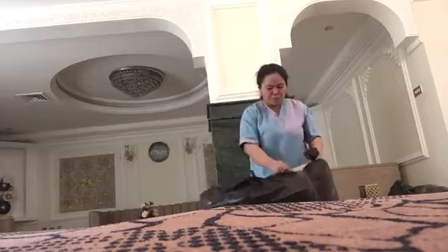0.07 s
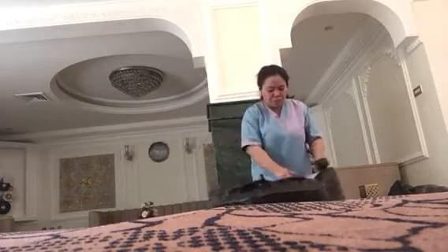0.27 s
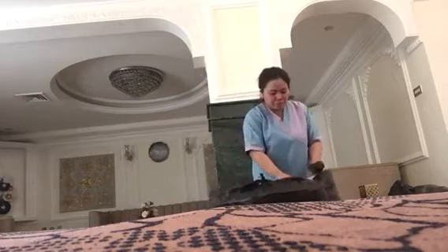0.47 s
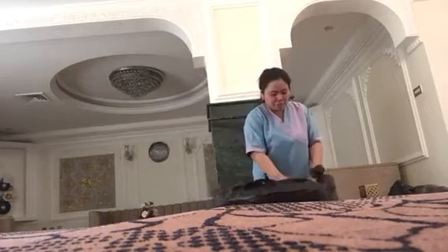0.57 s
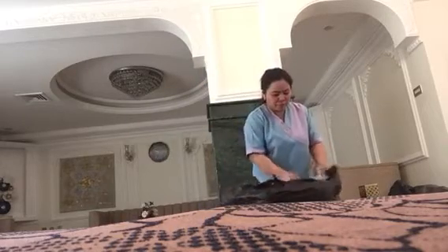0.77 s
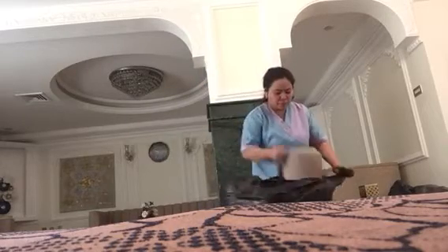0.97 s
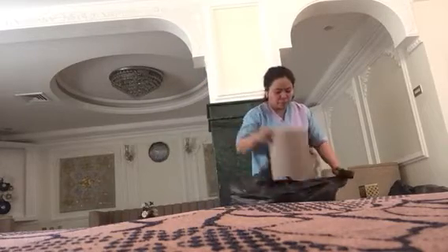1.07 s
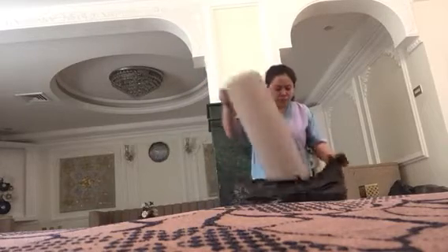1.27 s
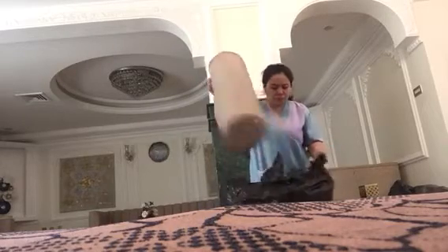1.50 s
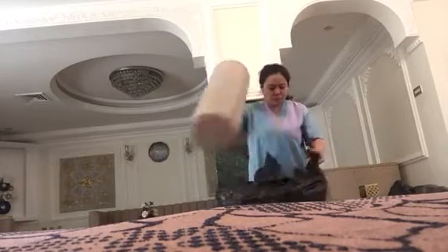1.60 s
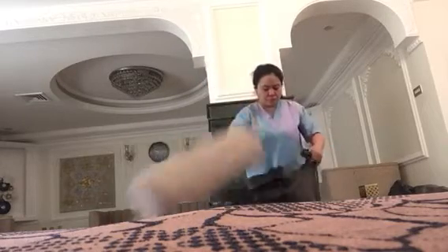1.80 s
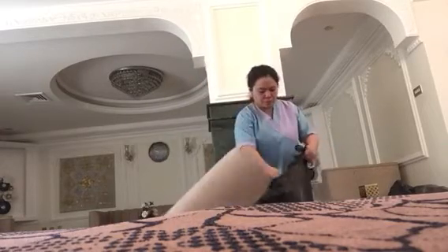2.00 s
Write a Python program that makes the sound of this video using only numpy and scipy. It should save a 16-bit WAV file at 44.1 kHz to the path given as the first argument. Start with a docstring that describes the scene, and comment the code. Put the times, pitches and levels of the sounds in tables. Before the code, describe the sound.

Cloth is handled in a large echoing room, opening with the loudest moment: soft booming thumps, sharp fabric snaps and two quick swishes at about 0.1 to 0.3 seconds. Lighter bumps follow near 0.45 and 0.6. Around 1 second a bolster cushion drags out of its bag with a quiet, rising hollow rub. Fabric keeps sliding until the cushion lands softly near 2 seconds, over faint hum and ventilation.

```python
"""Bolster cushion out of its bag

A bolster cushion is pulled out of a cloth bag, swung over and set down in a large, hard-walled room.
Soft thumps and a few snaps of taut cloth come first; then cloth slides and rubs in strokes, and the
cushion lands. The room booms and echoes over a faint electric hum and ventilation."""
import sys
import numpy as np
from scipy import signal
from scipy.fft import rfft, irfft
from scipy.io import wavfile
from scipy.ndimage import uniform_filter1d

SR = 44100
rng = np.random.default_rng(int(sys.argv[2]) if len(sys.argv) > 2 else 0)


def wav_out(sig):
    """Save sig, one row per channel (or a flat mono array), as 16-bit PCM at SR to the path in sys.argv[1]."""
    wavfile.write(sys.argv[1], SR, np.round(np.clip(np.atleast_2d(sig).T, -1, 1) * 32767).astype(np.int16))


N = 90404
T = np.arange(N) / SR

# Spectrum of rubbed stuffing. Each row: frequency in Hz, level in dB.
RUB_SPECTRUM = [(20, -26), (80, 5), (160, 7.5), (300, 8.5), (450, 1), (720, 2.5), (1400, -5), (1900, -10),
                (2600, -12.5), (5000, -27), (16000, -49)]


def amp(db):
    """Decibels to gain."""
    return 10 ** (np.asarray(db) / 20)


def unit(x):
    """Scale to rms 1."""
    return x / np.sqrt(np.mean(x ** 2) + 1e-20)


def interp_log(points, hz):
    """Interpolate a table on a log-frequency axis."""
    f, value = np.transpose(points)
    return np.interp(np.log(hz + 1), np.log(f + 1), value)


def colour(x, spectrum, peak_hz=1000, peak_db=0, width_oct=0.3):
    """Filter x by a spectrum plus one optional resonance; rms 1."""
    hz = np.fft.rfftfreq(N, 1 / SR)
    resonance_db = peak_db * np.exp(-0.5 * (np.log2((hz + 1) / peak_hz) / width_oct) ** 2)
    return unit(irfft(rfft(x) * amp(interp_log(spectrum, hz) + resonance_db), N))


def resonate(x, hz, width_hz):
    """Steep resonance following the curve hz; rms 1."""
    carrier = np.exp(2j * np.pi * np.cumsum(hz) / SR)
    pole = np.exp(-np.pi * width_hz / SR)
    return unit((carrier * signal.lfilter([1], [1, -2 * pole, pole * pole], x / carrier)).real)


def smooth_noise(first_samples, second_samples):
    """Noise through two moving averages; rms 1."""
    return unit(uniform_filter1d(uniform_filter1d(rng.standard_normal(N), first_samples), second_samples))


def stroke(peak_s, rise_s, hold_s, fall_s, db):
    """Envelope of one movement: Gaussian rise, hold, exponential fall."""
    rise = np.minimum(T - peak_s, 0) / rise_s
    fall = np.maximum(T - peak_s - hold_s, 0) / fall_s
    return amp(db) * np.exp(-0.5 * rise ** 2 - fall)


def friction(grit, flutter_db):
    """Fibre hiss and tiny slipping creases, fluttering as the contact changes."""
    creases_per_s, spread_db = 1300, 1.5
    creases = rng.standard_normal(N) * amp(spread_db * np.minimum(rng.exponential(1, N), 4))
    creases *= rng.random(N) < creases_per_s / SR
    flutter = amp(flutter_db * smooth_noise(300, 200))
    return (rng.standard_normal(N) + grit * unit(creases)) * flutter


def room(x, early_db, tail_db, early_decay_s):
    """Direct sound, near reflections and the long tail off hard walls."""
    # Room decay. Each row: frequency in Hz, T60 in seconds.
    decay = [(60, 0.61), (200, 1.14), (500, 1.16), (1300, 0.82), (3000, 1.02), (6000, 0.69), (16000, 0.5)]
    taps = rng.choice([-1., 1.], (2, N)) * (rng.random((2, N)) < 1 / 12) * (T > 0.006)
    hz, t, bins = signal.stft(taps[0], SR, nperseg=256)
    bins = bins * amp(-60 * t / interp_log(decay, hz)[:, None])
    tail = signal.istft(bins, SR, nperseg=256)[1][:N] * np.minimum(T / 0.064, 1)
    early = taps[1] * np.exp(-T / early_decay_s)
    echo = amp(tail_db) * tail / np.linalg.norm(tail) + amp(early_db) * early / np.linalg.norm(early)
    return x + signal.fftconvolve(x, echo)[:N]


def background():
    """Steady ventilation and a wavering electric hum."""
    # Ventilation spectrum. Each row: frequency in Hz, level in dB.
    air_spectrum = [(20, -29), (35, -2), (48, 16), (70, 2.5), (120, -4.5), (200, -2), (350, -10.5),
                    (800, -14.5), (2000, -23), (6000, -25.5), (9000, -33.5), (16000, -36)]
    air_db, hum_db, hum_hz = -58.5, -63.5, 99.5
    waver = unit(sum(np.sin(2 * np.pi * (hz * T + rng.random())) for hz in np.geomspace(0.4, 4, 10)))
    hum = amp(hum_db + 0.64 * waver) * np.sqrt(2) * np.sin(2 * np.pi * hum_hz * T)
    return amp(air_db) * colour(rng.standard_normal(N), air_spectrum) + hum


def slides():
    """Cloth slides over the cushion: friction with a high sheen."""
    # Each row: peak time, rise, hold and fall in seconds, level in dB, sheen in dB.
    strokes = [(0.085, 0.036, 0.042, 0.027, -65, -6), (0.706, 0.064, 0.085, 0.035, -70.5, 0.5),
               (0.829, 0.016, 0.14, 0.028, -63, 1), (0.962, 0.04, 0.085, 0.072, -58, 0),
               (1.185, 0.12, 0.27, 0.066, -64.5, -2.5), (1.375, 0.044, 0.019, 0.069, -58, 1.5),
               (1.498, 0.037, 0.043, 0.094, -64.5, 2.5), (1.692, 0.055, 0.11, 0.093, -69.5, -4),
               (1.879, 0.044, 0.047, 0.043, -61, 3.5), (1.959, 0.0063, 0.0098, 0.07, -51.5, -1.5)]
    # Each row: frequency in Hz, level in dB.
    spectrum = [(60, -7), (250, 5), (600, 3.5), (1200, 4.5), (2200, 1), (4200, 1), (5200, -1.5), (6100, 1),
                (7000, -3.5), (8200, -8.5), (9500, -7.5), (10400, -13), (11500, -8.5), (14000, -12.5),
                (16000, -12.5)]
    out = np.zeros(N)
    for *shape, sheen_db in strokes:
        hiss = friction(grit=0.57, flutter_db=1.0)
        out += colour(hiss, spectrum, peak_hz=13400, peak_db=sheen_db, width_oct=0.55) * stroke(*shape)
    return room(out, early_db=-18, tail_db=-12, early_decay_s=0.044)


def rubs():
    """Stuffing rubs under the hands: dull, grainy friction with a faint squeak."""
    # Each row: peak time, rise, hold and fall in seconds, level in dB, squeak in Hz.
    strokes = [(0.1, 0.0018, 0.046, 0.027, -48.5, 940), (0.635, 0.0028, 0.021, 0.055, -56, 1210),
               (0.874, 0.11, 0.016, 0.051, -63, 1230), (1.258, 0.09, 0.026, 0.02, -62.5, 1300),
               (1.361, 0.007, 0.034, 0.012, -58, 744), (1.863, 0.0057, 0.0056, 0.013, -62.5, 700),
               (1.961, 0.0016, 0.021, 0.052, -55, 1090)]
    out = np.zeros(N)
    for *shape, squeak_hz in strokes:
        grain = friction(grit=1.0, flutter_db=3.0)
        out += colour(grain, RUB_SPECTRUM, squeak_hz, peak_db=3.5, width_oct=0.25) * stroke(*shape)
    return room(out, early_db=-4, tail_db=-10.5, early_decay_s=0.015)


def snaps():
    """Cloth snaps taut: gritty clicks that peak within one cycle."""
    # Each row: start in seconds, pitch in Hz, level in dB.
    clicks = [(0.1362, 1800, -32.5), (0.1374, 680, -33), (0.1478, 1090, -42), (0.1525, 1280, -25.5),
              (0.1724, 730, -31.5), (0.4480, 610, -49.5), (0.6360, 890, -43), (0.645, 1640, -49)]
    rise_cycles = 0.79
    out = np.zeros(N)
    for start_s, hz, db in clicks:
        age = np.maximum(T - start_s, 0) * hz / rise_cycles
        tone = np.sin(2 * np.pi * hz * (T - start_s))
        grit = 0.33 * smooth_noise(13, 9)
        out += amp(db) * (tone + grit) * (age * np.exp(1 - age)) ** 2
    return room(out, early_db=-9.5, tail_db=-12.5, early_decay_s=0.06)


def thumps():
    """Soft blows on the padded floor: a low push and a cloth scuff, leaving a boom."""
    # Each row: peak time in seconds, pitch in Hz, level in dB, width in seconds, relative scuff in dB.
    blows = [(0.1451, 107, -24.5, 0.0037, -4), (0.1697, 105, -25, 0.005, -7.5),
             (0.1804, 140.2, -17, 0.00528, -14), (0.218, 84, -31, 0.0072, -12),
             (0.4330, 83, -39.5, 0.007, -11.5), (0.4539, 126.6, -31.5, 0.00735, -8),
             (0.6271, 95.5, -36, 0.0041, -10), (1.966, 165, -40, 0.0052, -2.5),
             (2.0337, 126, -38.5, 0.0085, -3)]
    # Each row: frequency in Hz, level in dB.
    scuff_spectrum = [(40, -3), (90, -13), (180, 1.5), (240, 0.5), (330, -3), (420, -13), (520, -10.5),
                      (800, -20.5), (1500, -33), (4000, -58), (16000, -93)]
    # Low resonances. Each row: frequency in Hz, level relative to the blow in dB, T60 in seconds.
    boom_modes = [(59, -26.5, 1.48), (90.3, -16.5, 1.0), (140, -19, 0.3), (184.5, -17, 0.28),
                  (253.7, -29, 0.26), (333, -29.5, 0.37), (524, -42, .5)]
    scuff_rise_s, scuff_fall_s = 0.0044, 0.023
    impacts, booms = np.zeros(N), np.zeros(N)
    for peak_s, hz, db, width_s, scuff_db in blows:
        push = np.cos(2 * np.pi * hz * (T - peak_s)) * np.exp(-0.5 * ((T - peak_s) / width_s) ** 2)
        age_s = np.maximum(T - peak_s + width_s, 0)
        scuff = colour(rng.standard_normal(N), scuff_spectrum)
        scuff *= np.minimum(age_s / scuff_rise_s, 1) * np.exp(-age_s / scuff_fall_s)
        impacts += amp(db) * (push + amp(scuff_db) * scuff)
        onset = np.minimum(age_s / width_s / 2, 1)
        for mode_hz, mode_db, t60_s in boom_modes:
            ring = np.sin(2 * np.pi * (mode_hz * age_s + rng.random()))
            booms += amp(db + mode_db - 60 * age_s / t60_s) * onset * ring
    return room(impacts, early_db=-10, tail_db=-17, early_decay_s=0.039) + booms


def sweeps():
    """Quick sweeps of smooth cloth: friction with a bright resonance."""
    # Each row: peak time, rise, hold and fall in seconds, level in dB, ring in Hz, ring boost in dB.
    strokes = [(0.194, 0.031, 0.049, 0.029, -50.5, 6500, 4.5),
               (0.247, 0.025, 0.023, 0.033, -51.5, 5100, 6.5)]
    # Each row: frequency in Hz, level in dB.
    spectrum = [(100, 0), (750, 8.5), (1100, -7), (1600, 2), (2500, -3.5), (3300, 1.5), (3900, -5.5),
                (4700, -2), (5800, -1.5), (7000, -9), (8700, -12.5), (10500, -16.5), (12500, -10.5),
                (13700, -11), (14600, -15), (16000, -16)]
    out = np.zeros(N)
    for *shape, ring_hz, ring_db in strokes:
        hiss = friction(grit=0.42, flutter_db=0.5)
        out += colour(hiss, spectrum, ring_hz, ring_db, width_oct=0.41) * stroke(*shape)
    return room(out, early_db=-7, tail_db=-11, early_decay_s=0.024)


def pull():
    """The cushion drags out of the bag: friction drives a rising hollow resonance and squeak."""
    # Each row: time in seconds, level in dB, hollow resonance in Hz, squeak in Hz.
    drag = [(0.898, -68, 192, 774), (1.015, -60.5, 212, 890), (1.06, -59.5, 192, 990),
            (1.10, -54, 213, 1120), (1.13, -57, 242, 1240), (1.147, -59, 273, 1530),
            (1.165, -52.5, 285, 1500), (1.189, -64.5, 298, 1560), (1.25, -74, 290, 1580)]
    times_s, *columns = np.transpose(drag)
    db, hollow_hz, squeak_hz = (np.interp(T, times_s, column) for column in columns)
    drive = friction(grit=0.57, flutter_db=2.5)
    hollow = resonate(drive, hollow_hz, width_hz=65)
    squeak = amp(-5) * resonate(drive, squeak_hz, width_hz=410)
    rustle = amp(-2.5) * colour(friction(grit=0.32, flutter_db=2.5), RUB_SPECTRUM)
    envelope = amp(db) * (T > times_s[0]) * (T < times_s[-1])
    return room((hollow + squeak + rustle) * envelope, early_db=-13.5, tail_db=-11, early_decay_s=0.027)


def scene():
    """All sources, mono."""
    return (thumps() + snaps() + sweeps() + slides() + rubs() + pull() + background())[None]


def record(dry):
    """Bass roll-off at 34 Hz, band limit at 15850 Hz."""
    highpass = signal.butter(4, 34, "highpass", fs=SR, output="sos")
    lowpass = signal.firwin(767, 15850, window=("kaiser", 9), fs=SR)
    return signal.oaconvolve(signal.sosfilt(highpass, dry), lowpass[None], "same")


dry = scene()
out = record(dry)
wav_out(out)
```